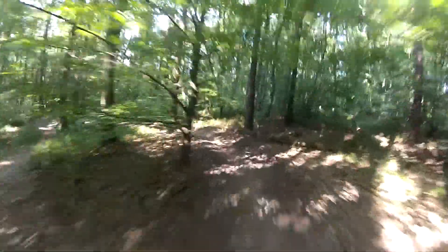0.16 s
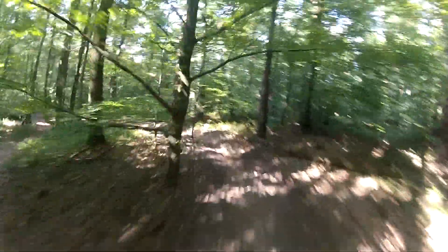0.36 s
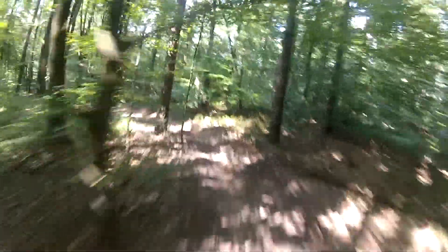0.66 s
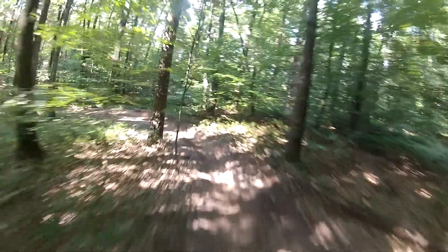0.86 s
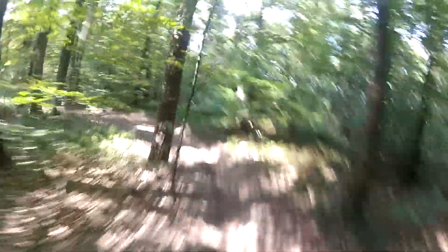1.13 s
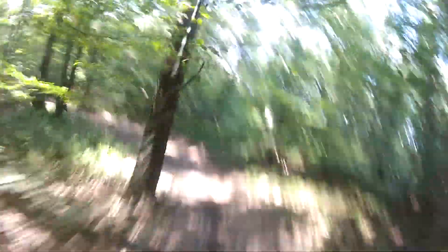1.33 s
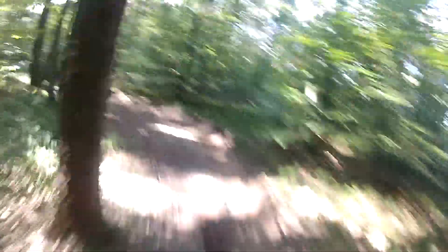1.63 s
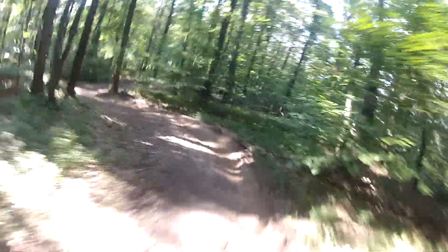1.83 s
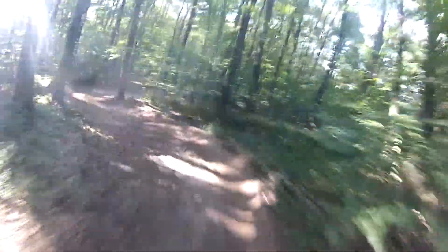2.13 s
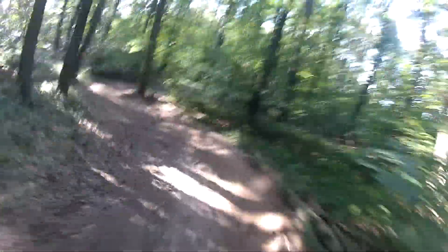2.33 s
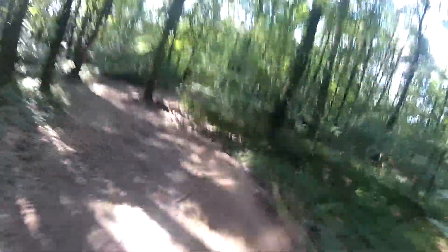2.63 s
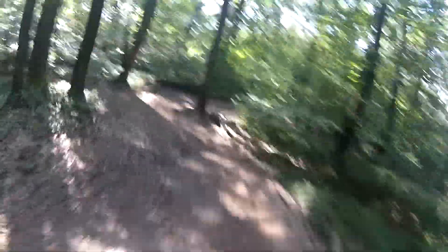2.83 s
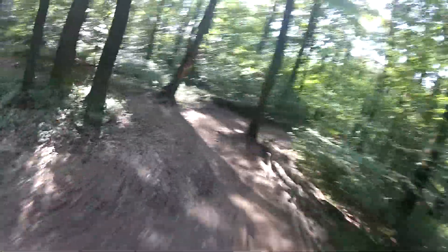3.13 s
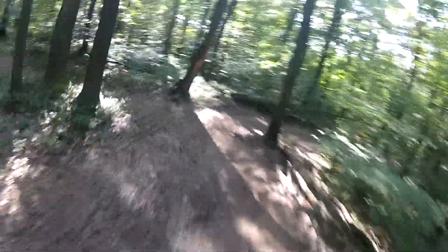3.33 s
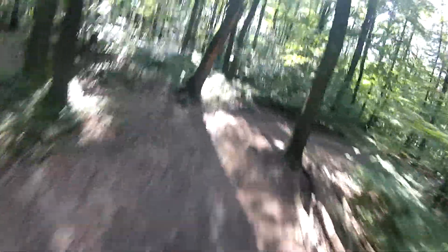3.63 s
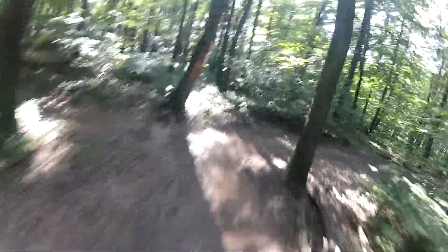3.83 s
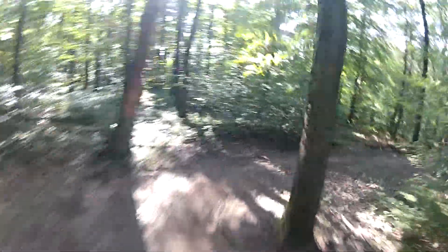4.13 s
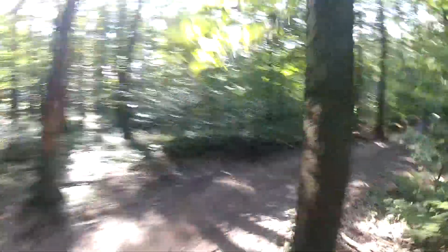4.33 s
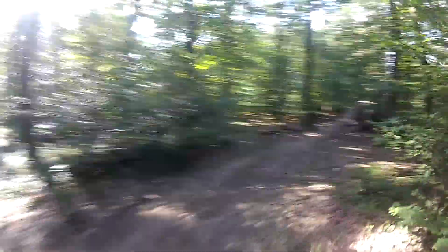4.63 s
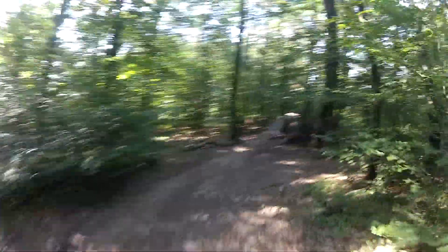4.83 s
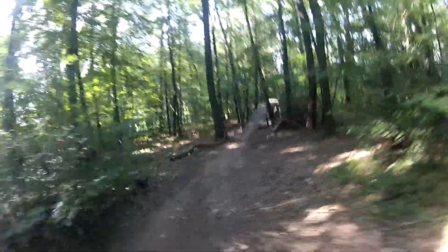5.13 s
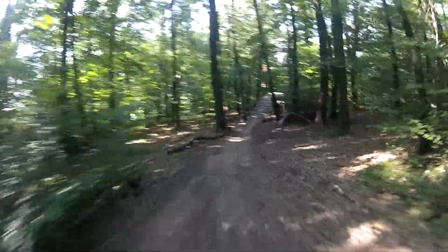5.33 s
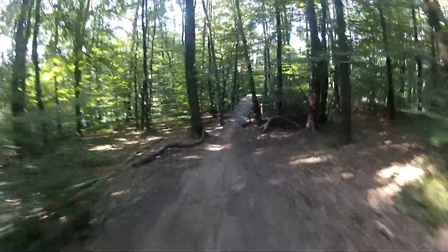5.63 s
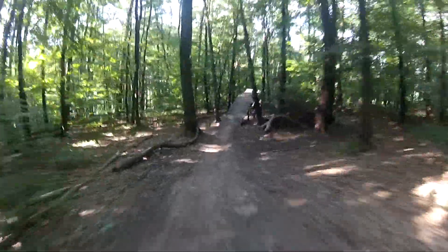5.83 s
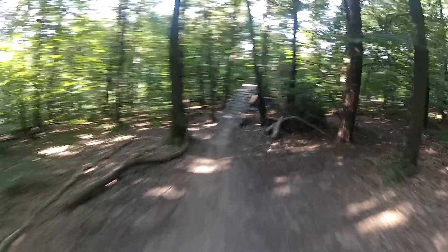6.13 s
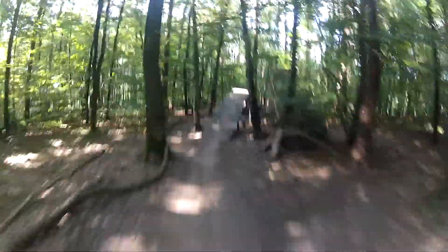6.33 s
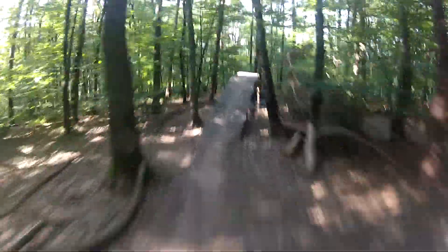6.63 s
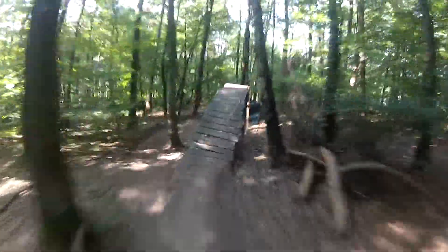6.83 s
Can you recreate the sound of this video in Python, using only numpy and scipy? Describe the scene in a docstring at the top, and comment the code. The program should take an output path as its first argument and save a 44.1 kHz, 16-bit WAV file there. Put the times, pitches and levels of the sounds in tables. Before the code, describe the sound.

A bike rolls fast along a woodland dirt path. Steady boxy wind and tyre noise opens, then roots hit with deep springy thuds, sharp plastic rattles and gritty scrapes in two clusters. The middle drops to a quiet low rumble with light ticks and faint scuffs. A soft double thud passes, then the rushing roar swells. Close, enclosed microphone riding along, dull with a thin sizzle on top.

```python
"""Mountain bike on a dirt trail

A mountain bike runs fast down a forest trail, heard from a camera in a closed case that rides along.
Tyres and air roar as shaped noise that follows the speed; dirt crackles as random tiny impacts.
Bumps push and swing the springy mount; hard knocks ring the case modes; chain and stones tick,
a joint creaks, tyres scuff. Low-rate sampling with a hold mirrors a thin sizzle into the treble."""
import sys
import numpy as np
from scipy import signal
from scipy.fft import rfft, irfft
from scipy.io import wavfile
from scipy.ndimage import uniform_filter1d

SR = 44100
rng = np.random.default_rng(int(sys.argv[2]) if len(sys.argv) > 2 else 0)


def put_to_file(sound):
    """Save the sound as 16-bit audio at rate SR, in the file named by the first command-line argument."""
    columns = np.atleast_2d(sound).T  # one column per channel
    safe = np.clip(columns, -1, 1)
    whole_steps = np.round(safe * 32767)
    wavfile.write(sys.argv[1], SR, whole_steps.astype(np.int16))


N = 307377
TIME = np.arange(N) / SR  # s


def undb(db):
    """Decibels to amplitude gain."""
    return 10 ** (np.asarray(db) / 20)


def unit(x):
    """Scale to rms 1."""
    return x / np.sqrt(np.mean(x ** 2))


def add(out, start_s, sound):
    """Mix a sound into out from start_s, cut at the end of the scene."""
    i = int(start_s * SR)
    out[i:i + len(sound)] += sound[:N - i]


def response(points, size=4096):
    """Minimum-phase impulse response with a given spectrum shape, peak 1."""
    hz, db = np.transpose(points)
    bins_hz = np.maximum(np.arange(size // 2 + 1), 0.5) * SR / size
    gain = undb(np.interp(np.log(bins_hz), np.log(hz), db))
    # folding the cepstrum onto positive time makes the response causal
    cepstrum = irfft(np.log(gain))
    cepstrum[1:size // 2] *= 2
    cepstrum[size // 2 + 1:] = 0
    h = irfft(np.exp(rfft(cepstrum)))
    return h / np.abs(h).max()


def through(x, h):
    """Convolve with an impulse response, keeping the length of x."""
    return signal.fftconvolve(x, h)[:len(x)]


def soften(x, cutoff_hz, order=6):
    """Butterworth low-pass, cutoff at most SR / 3."""
    return signal.sosfilt(signal.butter(order, min(cutoff_hz, SR / 3), fs=SR, output="sos"), x)


def noise(points):
    """Steady noise with a given spectrum shape, rms 1."""
    return unit(through(rng.standard_normal(N), response(points)))


def walk(rate_hz):
    """Slow random wander: smoothed random steps, rms 1."""
    k = int(SR / rate_hz)
    steps = np.repeat(rng.standard_normal(N // k + 1), k)
    return unit(uniform_filter1d(steps, k)[:N])


def grains(rate_hz, spread_db):
    """Random tiny impacts of either sign, mostly small and a few large."""
    size = undb(spread_db * np.minimum(rng.exponential(size=N), 4))
    return (rng.random(N) < rate_hz / SR) * size * rng.choice([-1, 1], N)


def swells(rows):
    """Summed power of bell-shaped swells; each row: centre in s, half length in s, level in dB."""
    return sum(undb(2 * db) * np.exp(-((TIME - s) / half_s) ** 2) for s, half_s, db in rows)


# Spectra of air and tyre roar, dirt crunch, mount rumble. Each row: frequency in Hz, relative level in dB.
ROAR_SPECTRUM = [(76, -29), (130, 0), (179, -2.5), (430, -4.5), (538, -9), (897, -7), (1040, -12),
                 (1160, -9), (2120, -9), (2570, -5.5), (3170, -18.5), (3900, -15.5), (4150, -26.5),
                 (5360, -32.5), (5900, -33), (7670, -66), (13000, -120)]
CRUNCH_SPECTRUM = [(530, -50), (900, 6.5), (1060, -8), (1140, -21.5), (1420, 1), (2410, 2), (2580, -1.5),
                   (3650, -6.5), (4590, -35), (5080, -14.5), (5900, -9.5), (7670, -62.5), (13000, -120)]
RUMBLE_SPECTRUM = [(11, -30), (18, 7), (27, 1.5), (43, -4.5), (80, 0), (92, -6.5), (124, -19.5), (178, -26),
                   (260, -20), (340, -65.5), (570, -120)]
# Roar level as it follows the speed. Each row: time in seconds, level in dB.
SPEED_CURVE = [(0.0, -53.5), (0.5, -55.5), (1.05, -55), (1.42, -52.5), (1.71, -58), (2.25, -59.5),
               (2.6, -61.5), (2.81, -61), (2.99, -65.5), (3.45, -65), (4.39, -64.5), (5.18, -64),
               (5.92, -58), (6.97, -51)]
# Rough ground. Each row: centre in seconds, half length in seconds, shaking in dB, loose grit in dB.
ROUGH_GROUND = [(1.446, 0.072, -28.5, -43.5), (1.687, 0.13, -44.5, -59.5), (2.363, 0.14, -37.5, -52),
                (2.79, 0.17, -35.5, -55.5), (3.196, 0.097, -47.5, -67), (4.55, 0.33, -51, -65),
                (5.52, 0.12, -47, -61.5), (5.88, 0.12, -43.5, -64)]
# Reference point of the speed curve, and base levels there
CRUISE_DB, ROAR_DB, RUMBLE_DB, DIRT_DB = -54.5, -50, -46.5, -56.5
# dB gained per dB of roar
RUMBLE_SLOPE, DIRT_SLOPE = 0.59, 1.39
DRONE_DB, DRONE_SLOPE = -49.5, 1.2  # level at cruise, dB per dB of roar
JINGLE_DB = -12  # against the dirt's level


def rolling():
    """Speed drives roar, mount rumble and dirt crunch; rough ground adds shaking and grit."""
    pace_db = np.interp(TIME, *np.transpose(SPEED_CURVE)) - CRUISE_DB
    rough_shaking = swells((s, half_s, db) for s, half_s, db, _ in ROUGH_GROUND)
    rough_grit = swells((s, half_s, db) for s, half_s, _, db in ROUGH_GROUND)
    shaking = np.sqrt(undb(2 * (RUMBLE_DB + RUMBLE_SLOPE * pace_db)) + rough_shaking)
    grit = np.sqrt(undb(2 * (DIRT_DB + DIRT_SLOPE * pace_db)) + rough_grit)

    rumble = noise(RUMBLE_SPECTRUM) * shaking
    rumble = rumble + drone() * undb(DRONE_DB + DRONE_SLOPE * pace_db)
    rumble = rumble * undb(1.9 * walk(12))

    # noise also excites the case modes
    roar = noise(ROAR_SPECTRUM) + undb(-16) * unit(through(rng.standard_normal(N), case_ring()))
    # below cruise the roar loses its treble
    rush = undb(np.minimum(0.25 * pace_db, 0))
    dull = soften(roar, 720, order=1)
    roar = (dull + rush * (roar - dull)) * undb(ROAR_DB + pace_db + 1.1 * walk(27))

    sand = unit(through(grains(rate_hz=2000, spread_db=3.5), response(CRUNCH_SPECTRUM)))
    sand = sand * undb(4.1 * walk(30))
    pebble = response(TICK_BODY_SPECTRUM) + undb(-19) * response(TICK_BRIGHT_SPECTRUM)
    pebbles = unit(through(grains(rate_hz=50, spread_db=5), pebble))
    dirt = undb(-1.76) * sand + undb(-8.5) * pebbles + undb(JINGLE_DB) * jingle()
    return rumble + roar + dirt * grit


DRONE_HZ, DRONE_WIDTH_HZ = 81, 22


def drone():
    """Wind and tyre buzz keep the springy mount ringing: noise through a resonance, rms 1."""
    resonance = signal.iirpeak(DRONE_HZ, DRONE_HZ / DRONE_WIDTH_HZ, fs=SR)
    return unit(signal.lfilter(*resonance, noise(RUMBLE_SPECTRUM)))


JINGLE_RATE_HZ, JINGLE_DECAY_S = 9, 0.012


def jingle():
    """The slack chain stirs at random moments, each a short, bright spray; rms 1."""
    decay = np.exp(-TIME[:SR // 10] / JINGLE_DECAY_S)
    stirs = through(np.abs(grains(rate_hz=JINGLE_RATE_HZ, spread_db=1.0)), decay)
    return unit(stirs * noise(TICK_BRIGHT_SPECTRUM))


# Hard knocks. Each row: time in seconds, blow in dB, case ring in dB, gap between rebounds in seconds,
# share kept per rebound (capped at 0.9), scrape in dB, snap in dB, hardness as low-pass cutoff in Hz.
KNOCK_EVENTS = [(1.3000, -17, -7, .00043, 0.97, -10.5, -25.5, 3310),
                (2.2842, -8.5, -4, 0.00172, 0.3, -11.5, -13, 3170),
                (2.6952, -6, -3, 0.0016, 0.33, -14.5, -42, 2880),
                (4.7305, -37, -13.5, 0.001212, 0.75, -18.5, -13.5, 4700)]
# Spectra of a blow and of scraping contact. Each row: frequency in Hz, relative level in dB.
BLOW_SPECTRUM = [(40, -31.5), (140, 8), (300, 5.5), (600, 2.5), (1200, 0), (2400, -26.5), (3400, -36),
                 (5900, -23)]
SCRAPE_SPECTRUM = [(200, -2.5), (800, 5), (1250, -8.5), (1800, 12.5), (2500, -6.5), (3500, 6), (4500, -20),
                   (5900, -22.5)]


def knocks(count=5):
    """The case hits its stop and rebounds in a quick, dying chatter that rings its modes."""
    out, t = np.zeros(N), TIME[:SR // 10]
    blow, ring = response(BLOW_SPECTRUM), case_ring()
    snap, rub = response(TICK_BRIGHT_SPECTRUM), noise(SCRAPE_SPECTRUM)
    for s, blow_db, ring_db, gap_s, keep, scrape_db, snap_db, hard_hz in KNOCK_EVENTS:
        contacts, k = np.zeros(len(t)), np.arange(count)
        contacts[(gap_s * k * SR).astype(int)] = min(keep, 0.9) ** k
        clack = undb(ring_db) * through(contacts, ring)
        add(clack, 0, undb(blow_db) * blow)
        clack += undb(scrape_db) * np.exp(-t / 0.0028) * rub[int(s * SR):][:len(t)]
        add(out, s - 0.0003, soften(clack, hard_hz, order=6))
        # the snap of each contact bypasses the low-pass
        add(out, s, undb(snap_db) * through(contacts, snap))
    return out


# Case modes. Each row: frequency in Hz, relative level in dB, time to fall 60 dB in seconds.
CASE_MODES = [(494, -16.5, 0.044), (745, -17.5, 0.029), (926, -20, 0.044), (1166, -12.5, 0.024),
              (1660, -25.5, 0.039), (1806, -16.5, 0.022), (1950, -16, 0.045), (2336, -2.5, 0.015),
              (2966, -12, 0.022), (3300, -17.5, 0.014)]


def case_ring():
    """The plastic case's answer to one tap: a sum of decaying modes, peak 1."""
    t = TIME[:SR // 10]
    ring = sum(undb(db - 60 * t / t60_s) * np.sin(2 * np.pi * hz * t) for hz, db, t60_s in CASE_MODES)
    return ring / np.abs(ring).max()


# Bumps. Each row: time in seconds, thud in dB, contact time in seconds,
# mount swing in dB before SWING_GAIN, mount pitch in Hz.
BUMP_EVENTS = [(1.276, -46, 0.0022, -14, 45.4), (1.302, -9.5, 0.0021, -18, 87.5),
               (1.389, -44, 0.0041, -18, 78), (1.4883, -9.5, 0.00089, -2.5, 89.5),
               (1.721, -16, 0.0032, -21, 81), (2.029, -34, 0.0034, -26, 79),
               (2.2881, -23, 0.00092, -3.5, 76), (2.415, -39, 0.0017, -23, 74),
               (2.694, -20, 0.0018, -6.5, 86), (2.84, -27, 0.0014, -15.5, 82),
               (2.852, -17, 0.00093, -17.5, 101), (2.9084, -14.5, 0.0012, -43, 84.5),
               (2.9152, -20, .0035, -6, 79), (2.972, -23, 0.0013, -14.5, 78.6),
               (3.213, -47, 0.0026, -29, 77), (3.6335, -24, 0.0059, -28.5, 77),
               (4.732, -24, 0.0038, -14.5, 78), (5.066, -16.5, 0.0062, -26, 86),
               (5.493, -47, 0.0052, -30.5, 80.6)]
# Spectrum of the shuddering frame. Each row: frequency in Hz, relative level in dB.
SHUDDER_SPECTRUM = [(60, -30.5), (130, 3.5), (200, 0), (330, -24.5), (520, -11), (900, -16), (2000, -19.5),
                    (3200, -29), (5900, -44)]
SWING_LAG_S, SWING_RISE_S, SWING_DECAY_S, SWING_GAIN = 0.004, 0.006, 0.014, 1.36
# Shudder levels are against the thud and against the swing
SHUDDER_THUD_DB, SHUDDER_SWING_DB, SHUDDER_RISE_S, SHUDDER_DECAY_S = -8.5, -17.5, 0.00093, 0.0054


def bumps():
    """A root or hole gives a dull push; the mount swings and dies away, and both shake the frame."""
    out, t = np.zeros(N), TIME[:SR // 4]
    frame = noise(SHUDDER_SPECTRUM)
    high_pass = signal.butter(1, 110, "high", fs=SR, output="sos")
    swing_envelope = (1 - np.exp(-t / SWING_RISE_S)) * np.exp(-t / SWING_DECAY_S)
    shudder_envelope = (1 - np.exp(-t / SHUDDER_RISE_S)) * np.exp(-t / SHUDDER_DECAY_S)
    for s, thud_db, contact_s, swing_db, mount_hz in BUMP_EVENTS:
        u = t / contact_s
        push = signal.sosfilt(high_pass, (u * np.exp(1 - u)) ** 6)
        swing = -np.sin(2 * np.pi * mount_hz * t) * swing_envelope
        shudder = frame[int(s * SR):][:len(t)] * shudder_envelope
        strain = np.hypot(undb(thud_db + SHUDDER_THUD_DB), undb(swing_db + SHUDDER_SWING_DB))
        # longer contact, lower cutoff
        add(out, s - contact_s, soften(undb(thud_db) * push, 1.0 / contact_s, order=2))
        add(out, s, soften(strain * shudder, 1.24 / contact_s, order=2))
        add(out, s + SWING_LAG_S, SWING_GAIN * undb(swing_db) * swing)
    return out


# Clearest ticks of chain and flung stones.
# Each row: time in seconds, body in dB and bright part in dB, both before a fixed trim.
TICK_EVENTS = [(.1426, -48, -47), (.695, -50, -51), (0.9895, -47.5, -48.5), (1.4066, -38, -42.5),
               (1.4534, -33, -45), (1.496, -33, -36.5), (1.6322, -37.5, -44), (1.7614, -46.5, -46),
               (1.8766, -41.5, -52.5), (2.171, -45.5, -48), (2.2272, -38.5, -42.5), (2.4212, -45.5, -47),
               (2.494, -43.5, -61), (2.5518, -47.5, -49), (2.577, -58, -55), (2.6142, -40.5, -48),
               (2.6292, -42.5, -53), (2.768, -40, -50), (2.8325, -43, -48), (2.9663, -43, -58),
               (3.4036, -54, -54), (3.491, -50.5, -52.5), (3.7915, -50.5, -51), (3.944, -50, -50),
               (4.397, -58, -58), (4.462, -47.5, -50), (4.587, -50, -51), (4.608, -51, -53.5),
               (5.0568, -50.5, -61), (5.5614, -62, -56), (6.42, -39.5, -60)]
# Spectra of the dull and bright part of a tick. Each row: frequency in Hz, relative level in dB.
TICK_BODY_SPECTRUM = [(200, -9), (900, -12.5), (1300, -10), (1700, -0.5), (2500, 0), (3200, -16),
                      (4300, -27), (5900, -34)]
TICK_BRIGHT_SPECTRUM = [(1000, -40), (2800, -19), (3600, -4.5), (5000, -5.5), (5900, -4.5)]
BODY_TRIM_DB, BRIGHT_TRIM_DB = -11.5, -7.0


def rattles():
    """Chain links and flung stones: a sharp tick and a brief spray of smaller ones."""
    out, t = np.zeros(N), TIME[:SR // 12]
    body, bright = response(TICK_BODY_SPECTRUM), response(TICK_BRIGHT_SPECTRUM)
    spray = unit(grains(rate_hz=2500, spread_db=2))
    decay = np.exp(-t / 0.015) + 0.59 * np.exp(-t / 0.0094)
    for s, body_db, bright_db in TICK_EVENTS:
        taps = spray[int(s * SR):][:len(t)] * decay
        taps[0] += 3  # the sharp first tick
        dull_part = undb(body_db + BODY_TRIM_DB) * unit(through(taps, body))
        bright_part = undb(bright_db + BRIGHT_TRIM_DB) * unit(through(taps, bright))
        add(out, s, dull_part + bright_part)
    return out


# Creaks, one row per slip. Each row: time in seconds, level in dB before a 3 dB cut, pitch in Hz.
CREAK_SLIPS = [(2.201, -23, 1540), (2.2079, -22.5, 1370), (2.215, -24, 1470), (3.7372, -32.5, 1830)]


def creaks():
    """A loaded joint slips in short steps, each a brief, raspy chirp of two tones and noise."""
    out, t = np.zeros(N), TIME[:SR // 25]
    rasp = noise(TICK_BODY_SPECTRUM)
    u = t / 0.0017  # time against the pulse peak
    for s, db, hz in CREAK_SLIPS:
        tone = np.sin(2 * np.pi * hz * t) + 0.64 * np.sin(2 * np.pi * 1.15 * hz * t)
        chirp = tone + undb(-7.5) * rasp[int(s * SR):][:len(t)]
        add(out, s, undb(db - 3.0) * u * np.exp(1 - u) * chirp)
    return out


# Sideways scuffs over loose dirt. Each row: centre in seconds, half length in seconds, level in dB.
SCUFF_EVENTS = [(1.292, 0.0032, -40.5), (1.357, 0.0096, -42), (1.456, 0.016, -40.5), (2.638, .012, -46.5),
                (2.776, 0.01, -57), (3.234, 0.014, -61), (3.86, .04, -61), (4.047, 0.0097, -61),
                (4.26, 0.0069, -59), (4.344, 0.028, -66), (5.8, 0.1, -55), (6.48, 0.066, -51)]
# Spectrum of a scuff. Each row: frequency in Hz, relative level in dB.
SCUFF_SPECTRUM = [(500, -23), (1200, -4), (1700, -4), (2400, 1), (3000, -4.5), (4000, -15.5), (5900, -37)]


def scuffs():
    """The tyres slide a little: a swell of fine, gritty scraping."""
    scrape = unit(through(grains(rate_hz=1100, spread_db=1.0), response(SCUFF_SPECTRUM)))
    return np.sqrt(swells(SCUFF_EVENTS)) * scrape * undb(1.3 * walk(60))


HISS_DB = -68.5  # before the low-rate sampling


def hiss():
    """The microphone's own faint hiss: white noise."""
    return undb(HISS_DB) * rng.standard_normal(N)


def scene():
    """All sources sum at one microphone, giving two equal channels."""
    mono = rolling() + scuffs() + knocks() + bumps() + rattles() + creaks() + hiss()
    return np.array([mono, mono])


HOLD_HZ, TOP_HZ = 12000, 15400  # sampling rate, top of the band


def record(dry):
    """Peaks are rounded; low-rate samples are held, so mirror images rise around that rate; top is cut."""
    rounded = dry / (1 + np.abs(dry / 0.9) ** 8) ** (1 / 8)
    slow = signal.resample_poly(soften(rounded, 5500, order=12), HOLD_HZ, SR, axis=1)
    steps = np.repeat(slow, 4, axis=1)
    held = signal.resample_poly(steps, SR, 4 * HOLD_HZ, axis=1)[:, :N]
    return signal.sosfilt(signal.ellip(10, 0.2, 80, TOP_HZ, fs=SR, output="sos"), held)


dry = scene()
out = record(dry)
put_to_file(out)
```